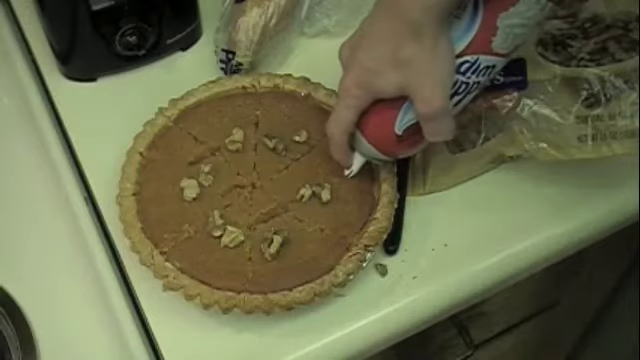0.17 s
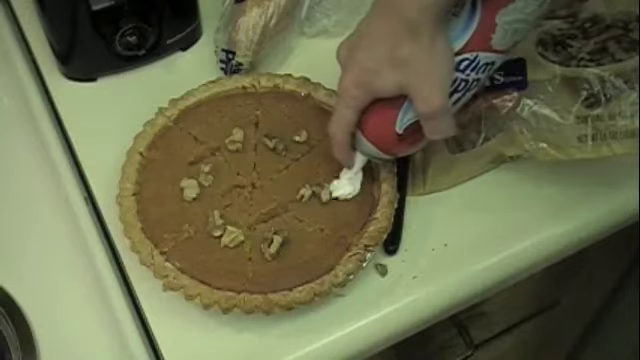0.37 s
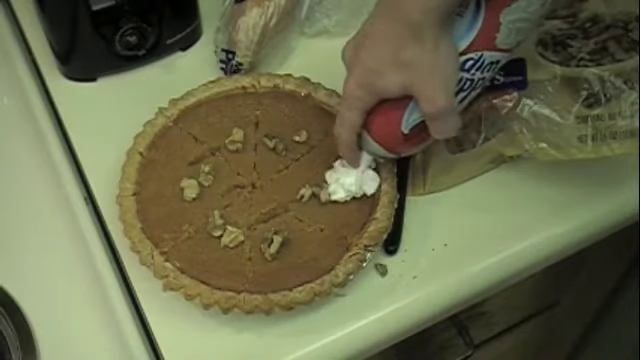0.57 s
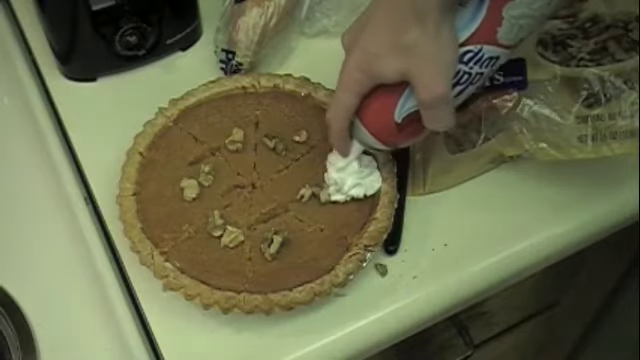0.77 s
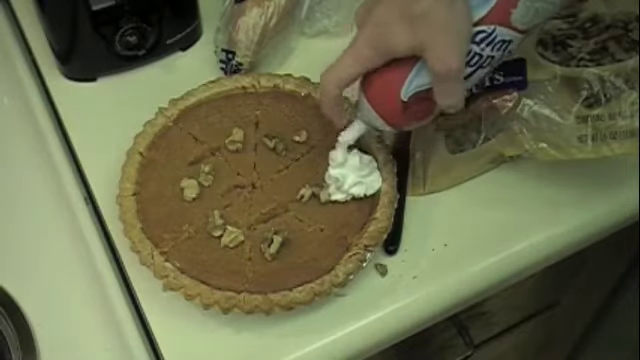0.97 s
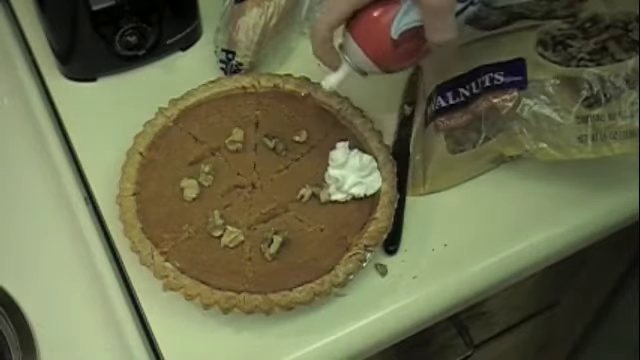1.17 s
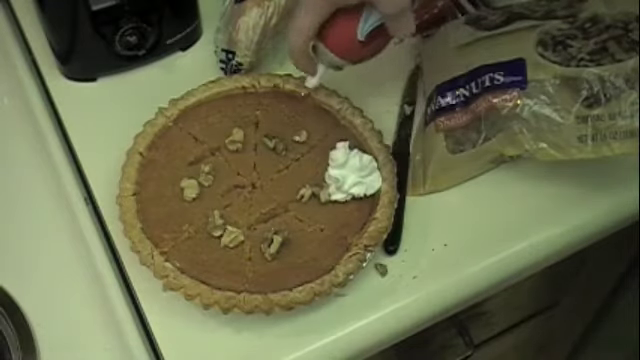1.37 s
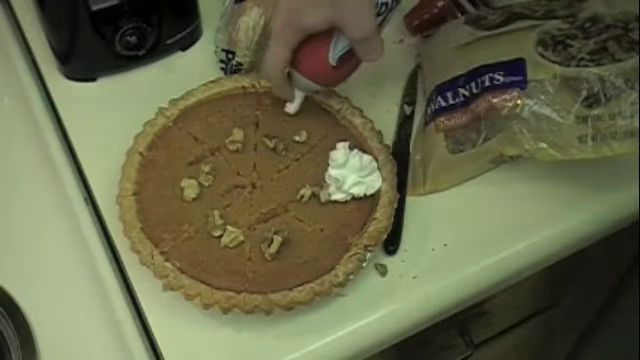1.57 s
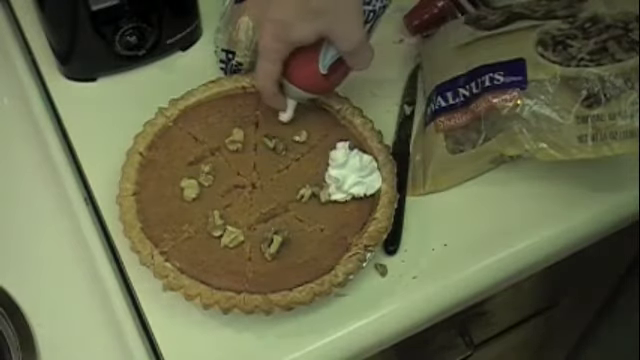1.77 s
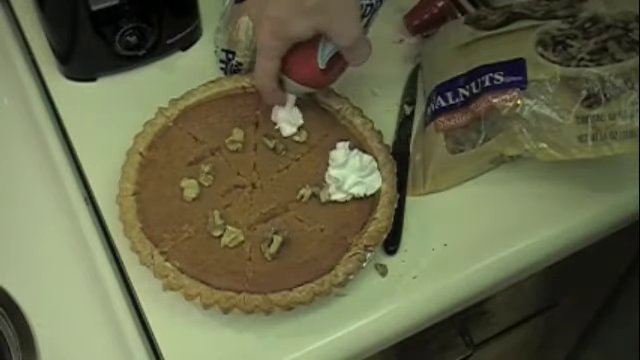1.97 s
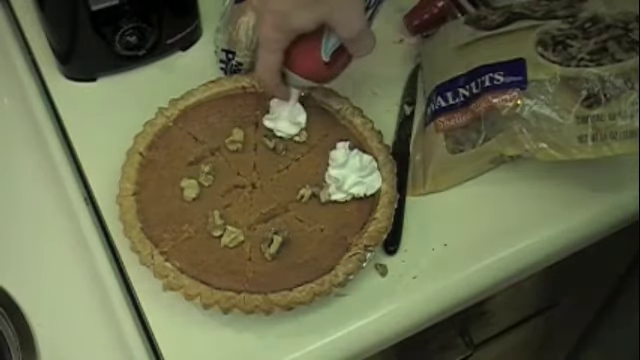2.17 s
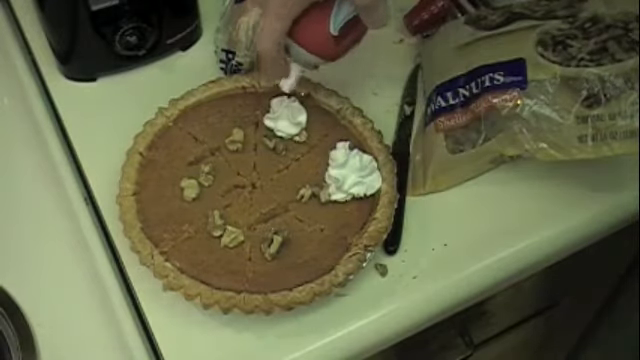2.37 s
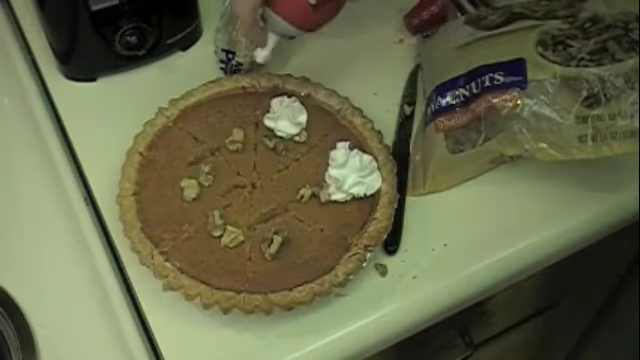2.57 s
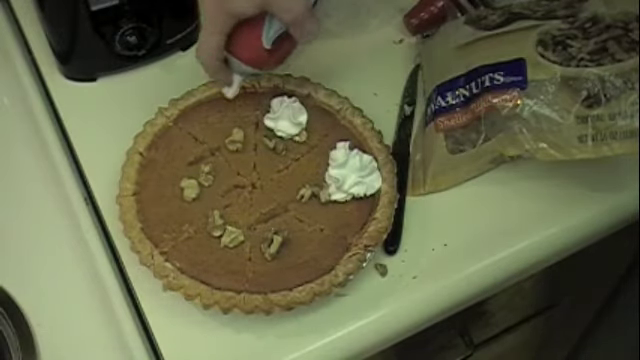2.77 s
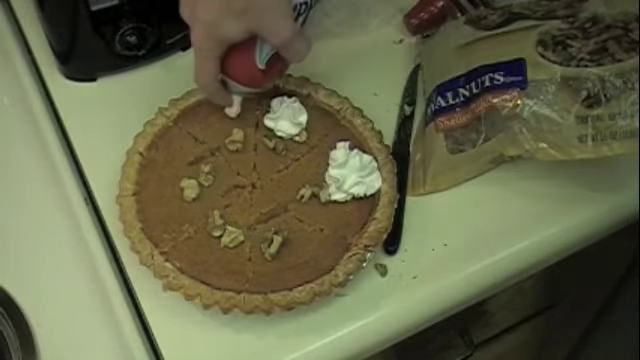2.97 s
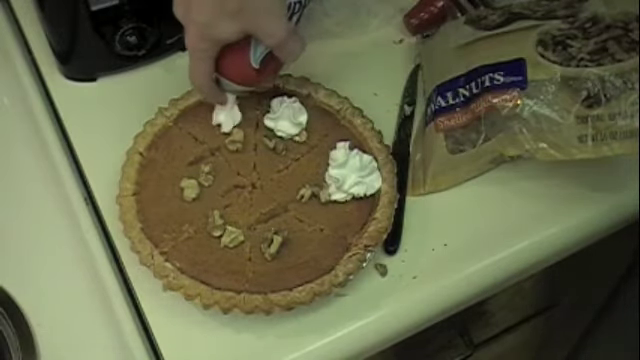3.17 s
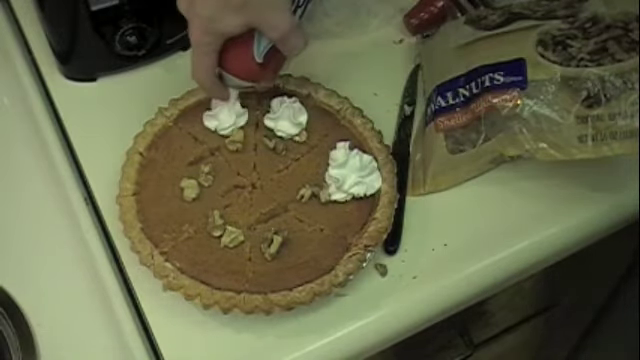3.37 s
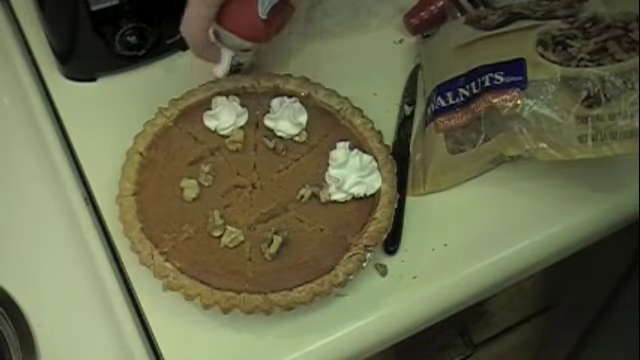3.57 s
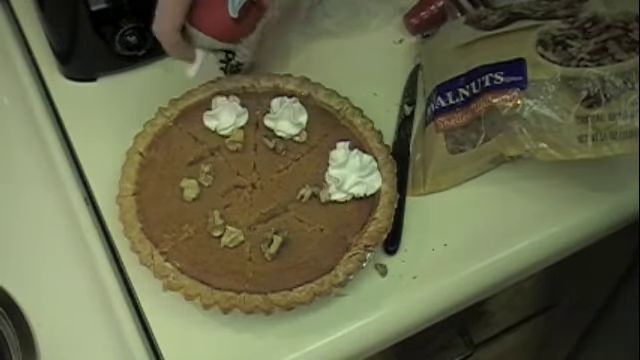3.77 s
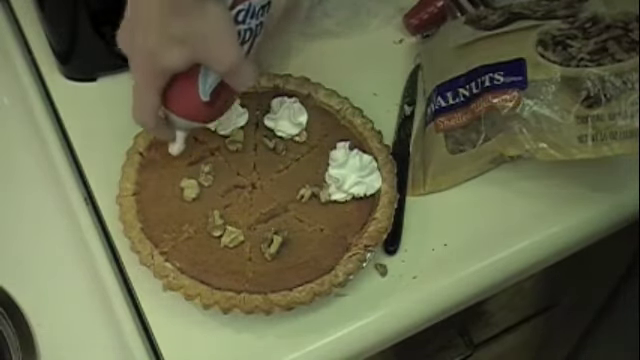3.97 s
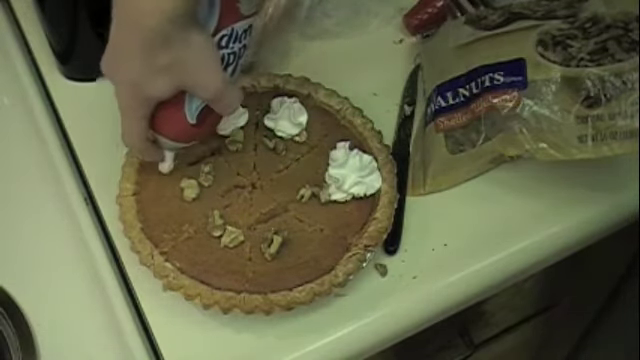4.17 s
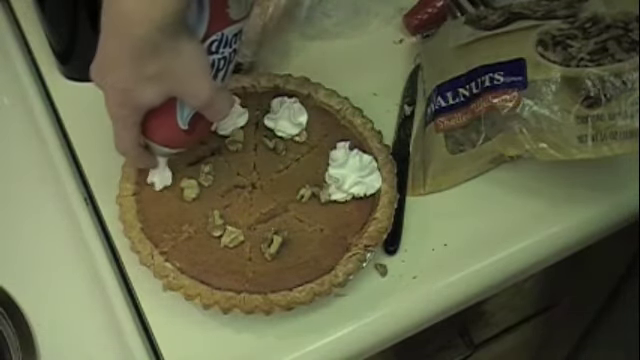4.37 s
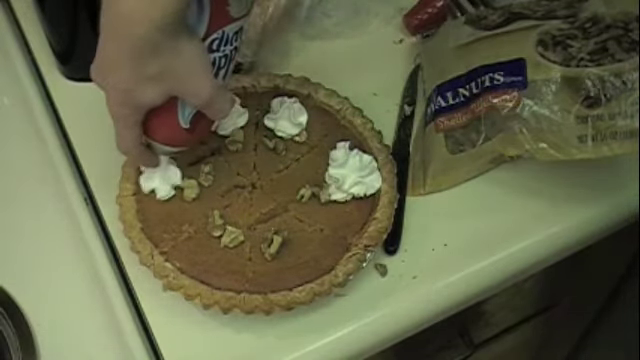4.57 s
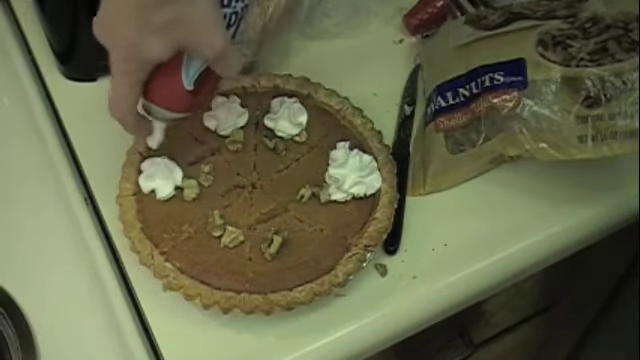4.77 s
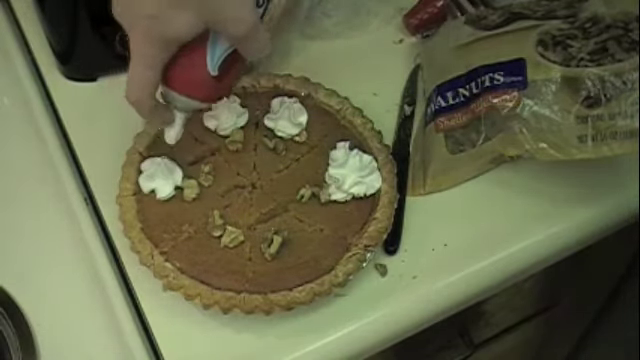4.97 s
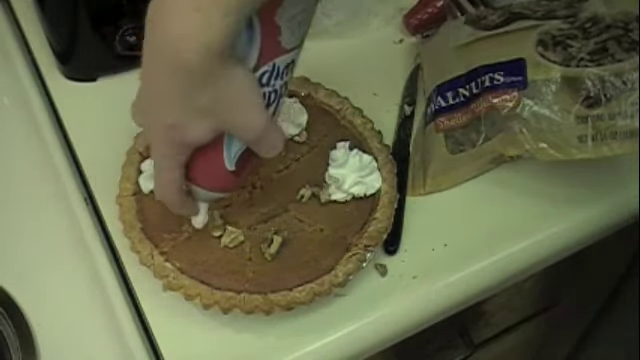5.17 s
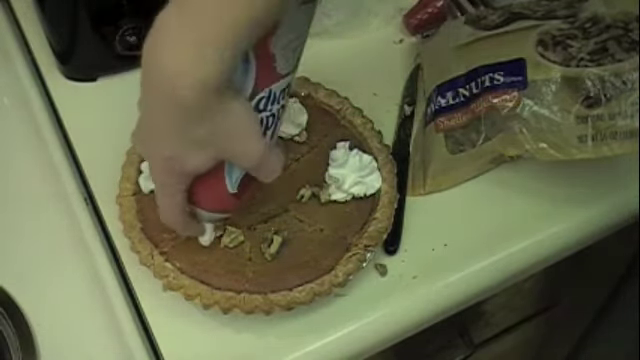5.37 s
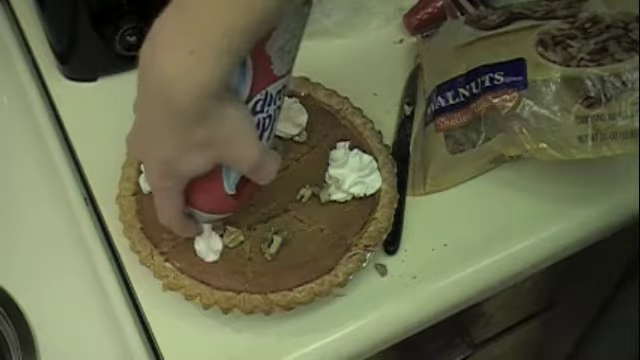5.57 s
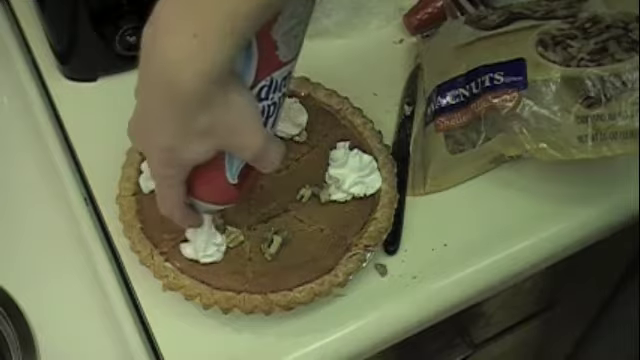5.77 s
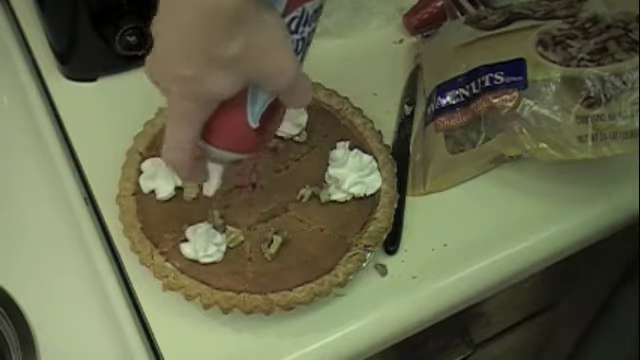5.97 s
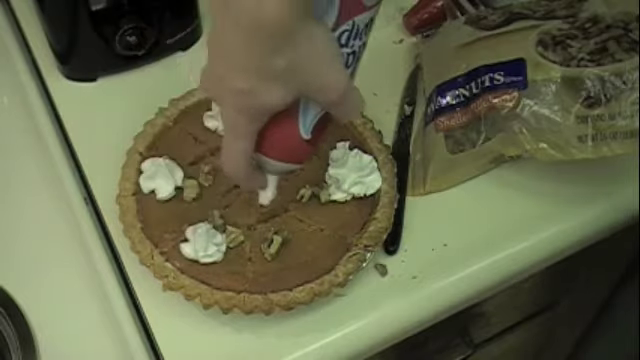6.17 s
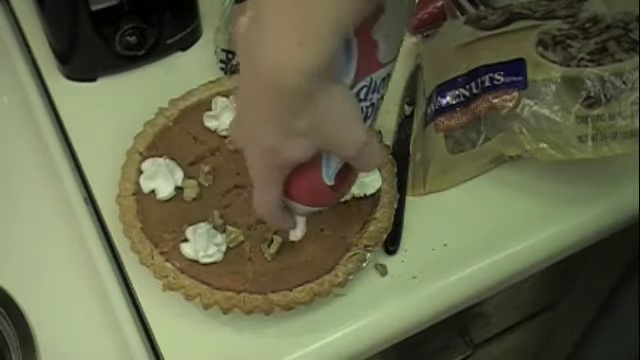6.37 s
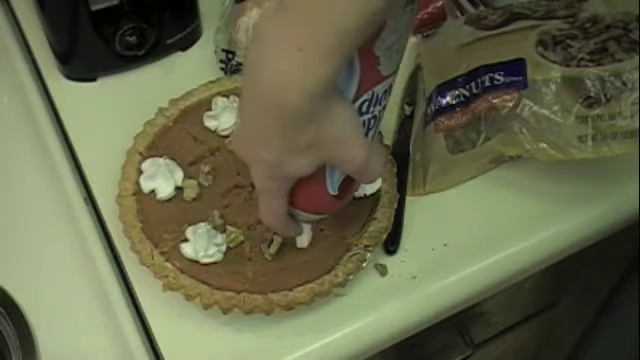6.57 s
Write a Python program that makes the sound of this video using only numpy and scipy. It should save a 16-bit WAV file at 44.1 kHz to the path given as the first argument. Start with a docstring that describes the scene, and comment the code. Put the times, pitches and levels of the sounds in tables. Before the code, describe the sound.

An aerosol cream can spits a sharp loud burst, hisses and sputters, then gives four softer squirts over a faint kitchen appliance hum.

```python
"""Five squirts of aerosol whipped cream onto a pie on a kitchen counter, close to the microphone.
The first press spits out a loud spurt of gas; then gas hisses through the nozzle, as shaped noise,
while foam sputters and pops, as decaying sines. The counter and the kitchen reflect it.
Behind lie an appliance's hum of wavering sines, a thin high whine of narrow noise and a rush of air."""
import sys
import numpy as np
from scipy import signal
from scipy.fft import rfft, irfft, next_fast_len
from scipy.io import wavfile

SR = 44100
rng = np.random.default_rng(int(sys.argv[2]) if len(sys.argv) > 2 else 0)


def waveform_to_disk(signal):
    """Save audio, clipped to [-1, 1], as 16-bit WAV at the path in sys.argv[1]."""
    frames = np.transpose(np.atleast_2d(signal))
    scaled = np.clip(frames, -1, 1) * 32767
    samples = np.round(scaled).astype(np.int16)
    wavfile.write(sys.argv[1], SR, samples)


N = 292383
T = np.arange(N) / SR

# relative gas noise spectrum of the nozzle filled with cream: f/Hz, density/dB
WET_NOZZLE = [(300, -27), (600, -13), (1000, -12), (1800, -13.5), (2800, -4.5), (3900, -4), (5000, -8),
              (5700, -5.5), (6700, -6.5), (7500, -0.5), (9200, -4), (10500, -8), (12000, -8), (15500, -18)]
# the first press: gas breaks out, cream reaches the nozzle, the finger lets go
GAS_OUT_S, CREAM_IN_S, LET_GO_S = 0.268, 0.336, 0.8244


def undb(db):
    """Amplitude ratio from a level in decibels."""
    return 10 ** (np.asarray(db) / 20)


def unit(x):
    """Normalisation to an rms of 1."""
    return x / np.sqrt(np.mean(x ** 2))


def colour(x, points):
    """Linear filtering in the spectrum: (f/Hz, gain/dB) points joined on a log-frequency axis."""
    hz, db = np.transpose(points)
    size = next_fast_len(len(x))
    f = np.maximum(np.fft.rfftfreq(size, 1 / SR), 1)
    gain = undb(np.interp(np.log(f), np.log(hz), db))
    return irfft(rfft(x, size) * gain, size)[:len(x)]


def resonate(x, hz, width):
    """Resonance: a second-order peak applied twice, for steep skirts."""
    b, a = signal.iirpeak(hz, hz / width, fs=SR)
    return signal.lfilter(b, a, signal.lfilter(b, a, x))


def noise(points):
    """Turbulence noise: Gaussian noise of rms 1 with the given spectrum."""
    return unit(colour(rng.standard_normal(N), points))


def walk(rate):
    """Random modulation: normal values at a rate in Hz joined by lines, spread near 1."""
    steps = rng.standard_normal(N // 8)
    return 1.2 * np.interp(T * rate, np.arange(len(steps)), steps)


def breathy_tone(hz, width):
    """Narrow-band noise: two random envelopes on carriers in quadrature, at a steady or moving pitch."""
    phase = 2 * np.pi * np.cumsum(hz * np.ones(N)) / SR
    return unit(walk(width) * np.cos(phase) + walk(width) * np.sin(phase))


def ragged(hz, width, rough_db):
    """Amplitude-modulated noise: a fast flutter, then one broad resonance."""
    fluttering = rng.standard_normal(N) * undb(rough_db * walk(900))
    return unit(resonate(fluttering, hz, min(width, 18000)))


def gate(start, stop, rise_s, fall_s):
    """Exponential envelope: swells up to the start, holds at 1, dies away after the stop."""
    before, after = np.minimum(T - start, 0), np.minimum(stop - T, 0)
    return np.exp(np.maximum(before / rise_s + after / fall_s, -40))


def damped_sine(hz, cycles, age):
    """Free oscillation of a bubble: a sine that decays by 60 dB in the given number of cycles."""
    return np.sin(2 * np.pi * hz * age) * np.exp(-np.log(1000) * hz * age / cycles)


def bubbles(pitch, spread, cycles, scatter_db, count):
    """Superposition of random bubble bursts: damped rings scattered about the pitch, rms 1 in all."""
    when, tune, size = rng.random((count, 3)).T
    start = (when * (N - 1)).astype(int)
    # log-logistic scatter of the pitch
    hz = np.clip(pitch[start] * (tune / (1 - tune)) ** spread, 300, 12000)[:, None]
    age = np.arange(256) / SR
    rings = damped_sine(hz, cycles, age)
    rings *= undb(scatter_db * size)[:, None] * np.sqrt(hz)
    places = start[:, None] + np.arange(len(age))
    return unit(np.bincount(places.ravel(), rings.ravel(), N)[:N])


def add(out, s, x):
    """Superposition of a short sound from a given time in seconds."""
    i = int(s * SR)
    out[i:i + len(x)] += x[:len(out) - i]


def air():
    """Broadband noise with partial stereo coherence: a fan-like rush, widest near 2 kHz."""
    # relative spectrum of the kitchen air: f/Hz, density/dB
    air_spectrum = [(30, -42), (90, -20), (150, -11), (230, -0.5), (400, -1.5), (750, -1), (1100, -5.5),
                    (1600, -5.5), (2300, -15), (3300, -12), (4600, -20), (9000, -19), (11500, -27),
                    (15000, -34)]
    mid_db = -56.5
    side = colour(noise(air_spectrum), [(100, -5.0), (600, -4), (2000, -2.5), (8000, -4)])
    stereo = noise(air_spectrum) + side * np.array([[1], [-1]])
    return undb(mid_db) * stereo * undb([[-1.1], [.9]])


def appliances():
    """Tonal and narrow-band radiation: wavering hum, noisy motor resonances, whistles and faint squeaks."""
    # steady tones of the appliances: f/Hz, rms level before waver and channel trim/dB
    hum_lines = [(59.2, -78), (119.6, -75.5), (199.2, -61), (398.4, -63.5), (845.2, -70), (887.2, -57),
                 (947.5, -73.5), (1416, -70.5), (1478, -64), (2164, -75.5), (3311, -71), (3542, -72),
                 (5319, -82), (6444, -82.5), (10051, -80.5), (15735, -75.5)]
    # narrow noisy motor resonances: f/Hz, nominal width/Hz, rms level before channel trim/dB
    motor_bands = [(203, 5.2, -72), (240.7, 22, -65.5), (353.4, 15, -67.5), (1440, 140, -71)]
    # a motor's wavering whistles: f/Hz, wander rate of the envelopes/Hz, nominal level/dB
    whistles = [(3270, 150, -69), (3580, 110, -72.5), (10070, 220, -77), (12200, 180, -89)]
    # swells of the whine: t/s, nominal level/dB, half length/s, f/Hz
    squeaks = [(1.29, -59, 0.026, 3480), (1.364, -52.5, 0.05, 3480), (2.475, -57, 0.018, 3300),
               (3.825, -60, 0.026, 3380), (3.971, -55, 0.022, 3340), (4.87, -71, 0.09, 3670),
               (5.59, -49.5, 0.018, 3460), (5.68, -46.5, 0.006, 3310)]

    out = np.zeros(N)
    drift = np.cumsum(0.000504 * walk(3)) / SR
    for hz, db in hum_lines:
        # the higher the line, the more its level wavers
        waver_db = 0.5 + 1.5 * min(hz / 5000, 1)
        level = np.sqrt(2) * undb(db + waver_db * walk(11))
        out += level * np.sin(2 * np.pi * (hz * (T + drift) + rng.random()))
    for hz, width, db in motor_bands:
        # widened, as the double resonance is narrower than a single one
        out += undb(db) * unit(resonate(rng.standard_normal(N), hz, 1.43 * width))
    for hz, width, db in whistles:
        out += undb(db - 1 + 2.4 * walk(14)) * breathy_tone(hz + 22 * walk(9), width)
    # one narrow tone swells at each squeak and glides between their pitches
    swell = sum(undb(db) * np.exp(-((T - s) / half) ** 2) for s, db, half, hz in squeaks)
    when, _, _, pitch = np.transpose(squeaks)
    broken = undb(1.5 * walk(90))
    out += undb(-1.5) * swell * broken * breathy_tone(np.interp(T, when, pitch), 220)
    return out * undb([[-1.0], [.7]])


def kitchen(x, counter_s=.00165, counter=0.055, near_db=-10, near_t60=0.075,
            room_db=-20, room_t60=0.47, sway=0.66):
    """Reflection and reverberation: a counter bounce, scatter from nearby things, a short room tail."""
    # stereo width of the reflections: f/Hz, side gain/dB
    width_curve = [(100, -28), (600, -2), (1300, -15), (2400, -11), (4400, -1.5), (8000, 1.5), (15000, -5)]
    # tone of the can at the microphone: f/Hz, gain/dB, left minus right/dB
    can_tone = [(40, -31, -4), (150, -31, 4), (275, -9, 4), (378, -5, -5), (543, -2, -1), (660, -6.5, -4.5),
                (1200, -2, -0.5), (2500, -3.5, -.5), (2830, -4, 0), (4470, -3.5, -3), (7300, -7, -1),
                (9500, -4.5, 3), (13150, -10, -1.5), (15500, -19, 4)]
    x = x + counter * np.interp(T - counter_s, T, x)
    age = T[:SR // 2]

    def tail(db, t60):
        """Exponential decay of diffuse energy: random echoes with the given total level."""
        one_energy = np.sqrt(2 * np.log(1000) / (t60 * SR))
        return undb(db - 60 * age / t60) * one_energy * rng.standard_normal(len(age))

    def echoes():
        """Convolution with one set of scattered paths."""
        return signal.oaconvolve(x, tail(near_db, near_t60) + tail(room_db, room_t60))[:N]

    # the paths change as hand and can move
    turn = sway * walk(2.7)
    side = colour(np.cos(turn) * echoes() + np.sin(turn) * echoes(), width_curve)
    mid = x + echoes()
    channels = []
    for sign in (1, -1):  # left, right
        tone = [(hz, db + sign * pan / 2) for hz, db, pan in can_tone]
        channels.append(colour(mid + sign * side, tone))
    return np.array(channels)


def rubs():
    """Friction noise: skin slides briefly over the can."""
    # the hand shifting on the can: t/s, level/dB, length/s, centre f/Hz
    slides = [(0.11, -61, 0.16, 2800), (1.116, -64, 0.059, 4000), (3.0, -60, 0.03, 3700),
              (4.118, -58, 0.031, 3740), (6.106, -58.5, 0.073, 3550)]
    return sum(undb(db) * gate(s, s + length, rise_s=0.003, fall_s=0.018)
               * ragged(hz, width=4700, rough_db=3) for s, db, length, hz in slides)


def cracks():
    """Impulsive radiation: each plug leaves with a single sharp swing of pressure."""
    # plugs of cream shot out by the first gas: t/s, peak level/dB, centre f/Hz
    plugs = [(0.27595, 1, 3300), (0.27955, -7, 7000)]
    out, t = np.zeros(N), T[:64] - T[32]
    for s, db, hz in plugs:
        u = (np.pi * hz * t) ** 2
        add(out, s + t[0], undb(db) * (1 - 2 * u) * np.exp(-u))
    return out


def first_blast(spit_db=-21.0, dry_hz=2450, wet_hz=1650, gulp_db=-33, gulp_hz=590, gulp_s=0.15):
    """Jet noise in a resonator: gas puffs, then a spit sinking as cream climbs, over a fading gulp."""
    # puffs of bare gas as the valve unseats: t/s, level/dB, length/s, centre f/Hz
    gas_puffs = [(0.245, -21.5, 0.0049, 8000), (0.267, -16.5, 0.011, 5200)]
    puffs = sum(undb(db) * gate(s, s + length, rise_s=0.00069, fall_s=2.05 * length)
                * ragged(hz, width=1.65 * hz, rough_db=4.0) for s, db, length, hz in gas_puffs)
    hz = np.interp(T, [GAS_OUT_S, CREAM_IN_S], [dry_hz, wet_hz])
    spit = breathy_tone(hz, 1350) + undb(-2.5) * ragged(2600, width=1900, rough_db=4)
    spit = unit(spit * undb(3.4 * walk(300)))
    spit *= gate(GAS_OUT_S, CREAM_IN_S, rise_s=0.0012, fall_s=0.014)
    gulp = ragged(gulp_hz, width=600, rough_db=0)
    gulp *= gate(GAS_OUT_S, CREAM_IN_S, rise_s=0.0009, fall_s=gulp_s)
    return puffs + undb(spit_db) * spit + undb(gulp_db) * gulp


def pops(rise_s=0.00048, splutter=3.36, splutter_s=0.0046, plop=1.5, plop_hz=560, plop_s=0.0021):
    """Damped bubble resonance: the sooner it tears, the more gas splutters and the more the cream plops."""
    # largest bubbles bursting at the nozzle: t/s, peak before overall trim/dB, f/Hz, cycles to -60 dB
    bursts = [(0.3255, -10, 1160, 15), (0.33, -10, 2180, 35), (0.4288, -17, 1800, 18),
              (0.594, -14, 1230, 6.7), (0.7088, -24, 1270, 25), (0.7341, -26, 1290, 18),
              (0.821, -26, 1320, 14), (1.8715, -34, 1910, 14), (1.8874, -28.5, 1970, 9.3),
              (1.938, -27, 1840, 16), (1.9503, -25.5, 2130, 17), (1.974, -29, 1840, 14),
              (2.013, -27, 1700, 17), (2.1382, -21, 1350, 5.7), (2.168, -25, 1730, 9.7),
              (2.1958, -27, 1720, 14), (3.1853, -27, 1670, 7.6), (3.2146, -25.5, 1633, 6.5),
              (3.2398, -26, 1660, 9.1), (3.3792, -28, 4020, 30), (4.4868, -23.5, 1460, 4.5),
              (4.5338, -26, 1350, 11), (4.5423, -28, 1395, 4.7), (4.5848, -28, 4560, 16),
              (4.6144, -28, 4540, 9.1), (4.631, -24, 1170, 5.5), (5.7354, -22, 1110, 5.8),
              (5.7504, -21, 1500, 2.8)]
    out, age = np.zeros(N), np.arange(1024) / SR
    for s, db, hz, cycles in bursts:
        ring = damped_sine(hz, cycles, age)
        gas = splutter * colour(rng.standard_normal(len(age)), WET_NOZZLE) * np.exp(-age / splutter_s)
        cream = plop * np.sin(2 * np.pi * plop_hz * age) * np.exp(-age / plop_s)
        pop = (ring + (gas + cream) / cycles) * (1 - np.exp(-age / rise_s))
        add(out, s, undb(db) * pop / np.abs(pop).max())
    return undb(-5.0) * out


def first_squirt():
    """Two-phase flow of gas-rich cream: a strong hiss with a coarse sputter, both sinking steadily."""
    # relative gas noise spectrum of the nearly dry nozzle: f/Hz, density/dB
    dry_nozzle = [(1180, -12.5), (2000, -2.5), (2770, -5), (3260, -0.5), (4920, 1), (5640, -4), (6360, -1),
                  (6870, -2.5), (7290, 1.5), (9030, 1.5), (12600, -8.5), (15000, -25), (15500, -48)]
    valve = gate(GAS_OUT_S, LET_GO_S, rise_s=0.0024, fall_s=0.015)
    age = np.maximum(T - GAS_OUT_S, 0)
    # both sink, in dB per s, as the spare gas runs out
    hiss = valve * undb(-27.5 - 14 * age)
    foam = valve * undb(-36 - 23 * age + 2.3 * walk(59.8))
    gas = unit(noise(dry_nozzle) * undb(1.0 * walk(400)))
    # the bubbles grow, and so sound lower, as the cream thickens
    hz = np.interp(T, [CREAM_IN_S, LET_GO_S], [1720, 1380])
    sputter = bubbles(hz, spread=0.237, cycles=26.0, scatter_db=15.5, count=6000)
    # the hollow of the nozzle and the cream gurgles at two shifting pitches
    shift = 1 + 0.042 * walk(25)
    gurgle = undb(-3.0) * breathy_tone(1200 * shift, 330) + undb(-2.5) * breathy_tone(1850 * shift, 450)
    return hiss * gas + foam * (undb(2) * sputter + undb(0.5) * gurgle)


def later_squirts():
    """Flow through a choked nozzle: hiss and fizz grow as the finger bears down, while foam sputters."""
    # later presses: start t/s, strongest flow t/s, let go t/s, nominal hiss level at its strongest/dB,
    # rise up to then/dB, sag after it/(dB per s), nominal sputter level/dB, bubble f/Hz, nozzle f/Hz
    presses = [(1.875, 2.074, 2.25, -47.5, 5, 6, -52, 1814, 4452),
               (3.09, 3.21, 3.43, -48.5, 15.5, 20, -57, 1670, 4400),
               (4.36, 4.54, 4.642, -49, 10, 15, -60, 1440, 4620),
               (5.548, 5.756, 5.81, -47.5, 4.5, 38, -58, 1700, 4760)]
    valve_open_s, valve_close_s = 0.021, 0.023  # time constants

    fizz = bubbles(np.full(N, 6000.), spread=0.46, cycles=11, scatter_db=22, count=5000)
    fizz = unit(colour(fizz, WET_NOZZLE))
    gas = undb(3.5) * unit(noise(WET_NOZZLE) + undb(-8) * fizz)
    hiss, foam = np.zeros(N), np.zeros(N)
    times, bubble_points, nozzle_points = [], [], []
    for start, full, stop, db, rise_db, sag_db, foam_db, bubble, nozzle in presses:
        swell_db = np.interp(T, [start, full, stop], [-rise_db, 0, -sag_db * (stop - full)])
        valve = gate(start, stop, valve_open_s, valve_close_s)
        hiss += undb(db + swell_db) * valve
        # gas leaks through a half-closed valve, foam hardly does
        foam += undb(foam_db) * valve ** 4
        times += [start, stop]
        bubble_points += [bubble, bubble]
        nozzle_points += [nozzle, nozzle]
    bubble_hz = np.interp(T, times, bubble_points)
    # gas and the finest bubbles ring the nozzle, whose pitch shifts with the cream in it
    nozzle_hz = np.interp(T, times, nozzle_points) * (1 + 0.03 * walk(18))
    fine = bubbles(nozzle_hz, spread=0.05, cycles=17, scatter_db=10, count=2500)
    ringing = breathy_tone(nozzle_hz, 1100) + undb(-2) * fine
    whistle = undb(-4.5) * ringing * undb(2.7 * walk(45))
    sputter = bubbles(bubble_hz, spread=0.14, cycles=29, scatter_db=2, count=3500)
    sputter *= undb(2 * walk(50))
    flutter = undb(1.94 * walk(220) + 0.27 * walk(40))
    return flutter * (hiss * (gas + whistle) + foam * sputter)


def scene():
    """Superposition: the can in the kitchen, over the steady background."""
    can = first_blast() + cracks() + first_squirt() + later_squirts() + pops() + rubs()
    return kitchen(can) + appliances() + air()


def record(dry):
    """Band limiting: a steep elliptic low-pass cuts the top above 15850 Hz."""
    return signal.sosfilt(signal.ellip(12, .1, 80, 15850, fs=SR, output="sos"), dry)


dry = scene()
out = record(dry)
waveform_to_disk(out)
```